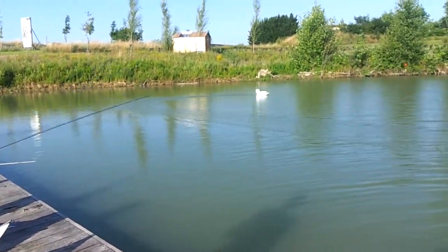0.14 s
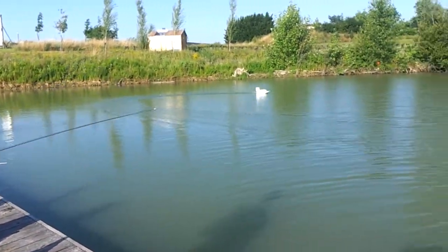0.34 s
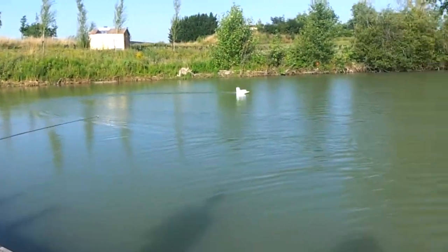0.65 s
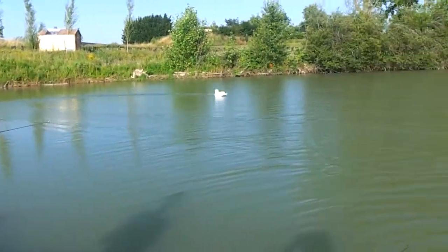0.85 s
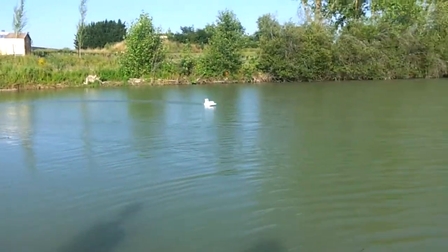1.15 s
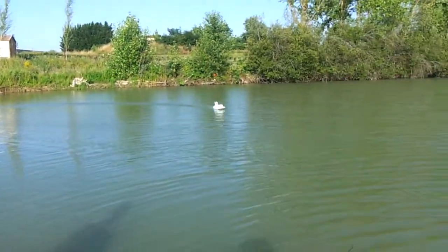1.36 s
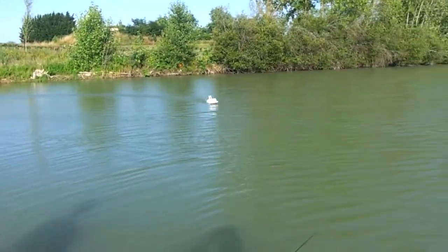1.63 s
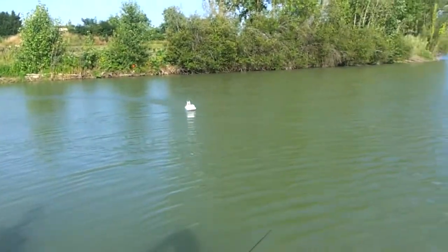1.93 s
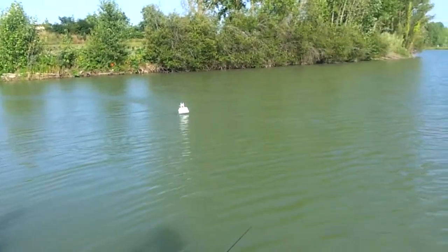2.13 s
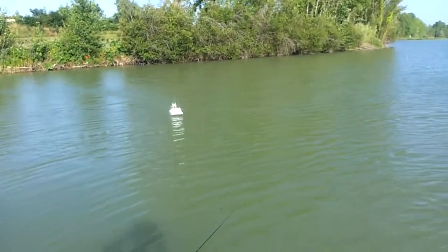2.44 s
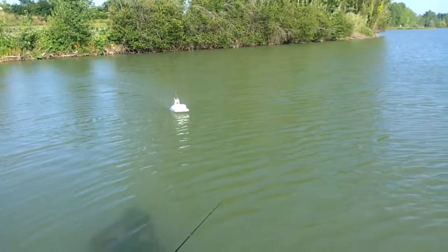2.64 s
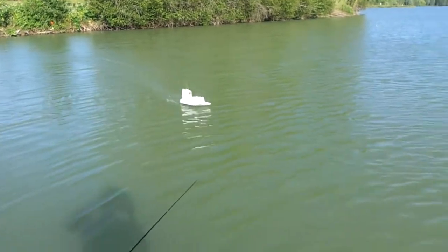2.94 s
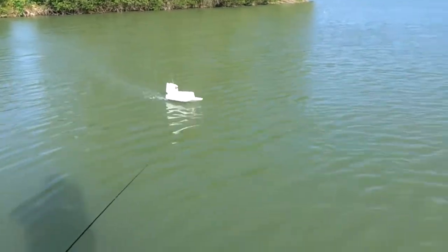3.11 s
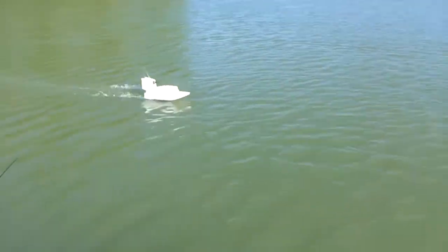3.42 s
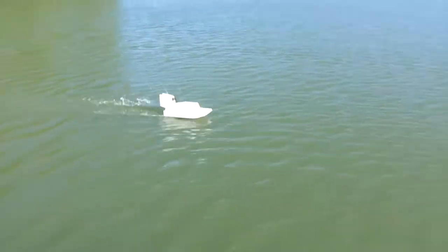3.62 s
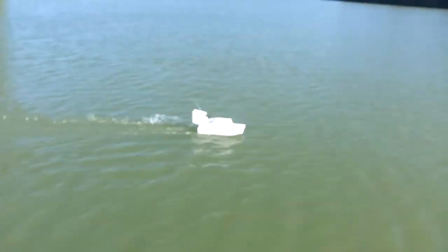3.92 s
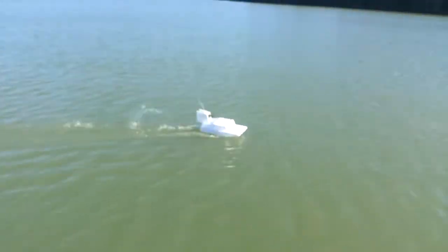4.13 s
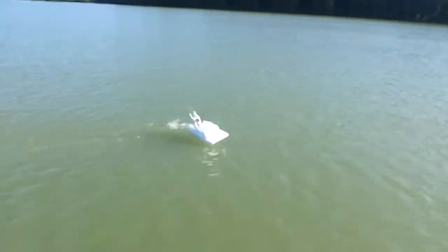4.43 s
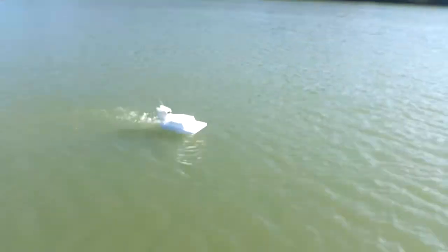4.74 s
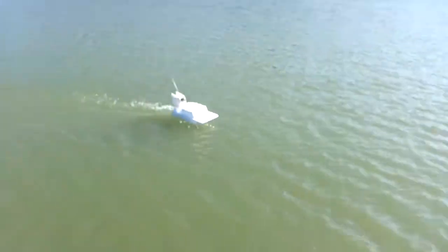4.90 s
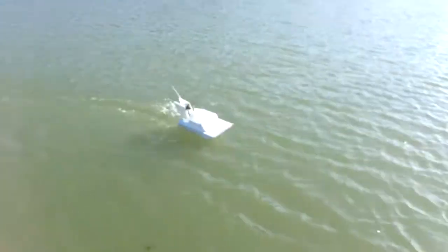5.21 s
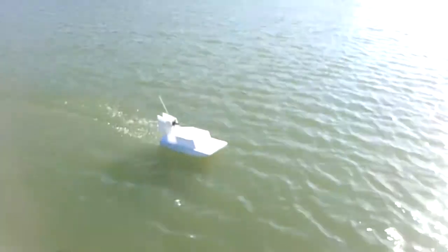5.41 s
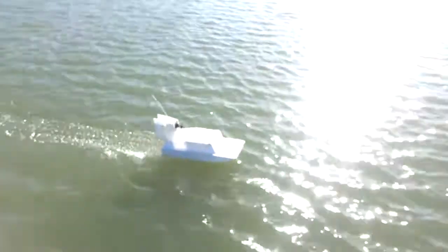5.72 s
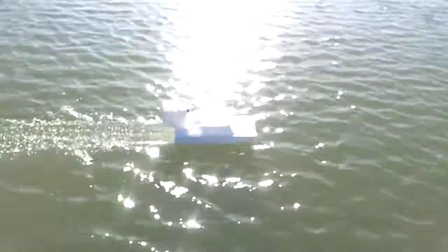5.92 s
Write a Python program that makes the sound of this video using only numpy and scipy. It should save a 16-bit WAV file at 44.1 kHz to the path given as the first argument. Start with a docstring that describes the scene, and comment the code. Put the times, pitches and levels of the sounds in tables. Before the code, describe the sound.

A small model airboat runs on an open pond, heard through a hand-held camera's stereo microphone. From 0 to 1 second, violent wind buffeting dominates: low, rough thumps and crackling blasts, mainly on the right, clip and make the whole sound dip briefly. The propeller's steady buzzing whine is faint underneath. Around 1.1 seconds its hiss grows clearer, then recedes near 1.8 while more gusts hit between 1.5 and 2.5. From 2.1 the boat is stronger, a high-speed drone with fluttering airy hiss, interrupted by scattered puffs. Between 3.5 and 4.3 lighter thumps move to the left. Then the wind almost vanishes and at about 4.4 the propeller surges forward, bright and hissy, slightly hollow from water reflections. It eases, swells again near 5.1, and takes on a rougher buzz from 5.5, still running at 6 seconds. Its pitch barely changes throughout.

```python
"""Airboat on a windy pond

A model airboat curves in over a pond. Its two-blade air propeller whines as steady tones and hisses
as noise that swells at each blade passage; the hiss and the drifting tones also bounce off the water.
Gusts of shaped noise and single thumping puffs buffet a hand-held camera's two unlike microphone ports,
mostly the right one. A gain control makes the whole sound dip briefly at overloads, and peaks clip."""
import sys
import numpy as np
from scipy import signal
from scipy.fft import rfft, irfft, next_fast_len
from scipy.io import wavfile
from scipy.ndimage import uniform_filter1d, minimum_filter1d, map_coordinates

SR = 44100
rng = np.random.default_rng(int(sys.argv[2]) if len(sys.argv) > 2 else 0)


def log_audio(samples):
    """Write samples as a 16-bit WAV file to the path given in sys.argv[1]."""
    # one column per channel
    frames = np.atleast_2d(samples).T
    # limit to full scale, then quantise
    limited = np.clip(frames, -1, 1)
    pcm = np.round(limited * 32767).astype(np.int16)
    wavfile.write(sys.argv[1], SR, pcm)


def voltage_ratio(level):
    """Linear amplitude factor for a level in decibels (scalar or array-like)."""
    return 10 ** (np.asarray(level, float) / 20)


N = 267246
T = np.arange(N) / SR


def unit(x):
    """Scales each row to an rms (average strength) of 1."""
    return x / np.sqrt(np.mean(x ** 2, axis=-1, keepdims=True) + 1e-20)


def along(points, hz):
    """Reads a table of (f/Hz, value) points on a log frequency axis."""
    f, v = np.transpose(points)
    return np.interp(np.log(hz + 1), np.log(f + 1), v)


def curves(rows):
    """Draws one value per sample for each column after the time."""
    s, *columns = np.transpose(rows)
    return np.array([np.interp(T, s, column) for column in columns])


def wobble(rate):
    """Draws a smooth random curve with rate random points a second."""
    points = rng.standard_normal(int(N * rate / SR) + 4)
    return map_coordinates(points, [T * rate])


def swell(start_s, end_s, edge_s):
    """Rises from 0 to 1 over the span and falls back, with soft edges."""
    return (np.tanh((T - start_s) / edge_s) - np.tanh((T - end_s) / edge_s)) / 2


def filtered(x, response):
    """Shapes the loudness and phase of x at each frequency."""
    size = next_fast_len(N + 8192)
    hz = np.fft.rfftfreq(size, 1 / SR)
    return irfft(rfft(x, size) * response(hz), size)[..., :N]


def below(x, edge_hz):
    """Keeps the part of x under a soft edge."""
    return filtered(x, lambda hz: 1 / (1 + (hz / edge_hz) ** 8))


def tones(turn, levels):
    """Sines at multiples of the shaft speed; turbulence makes them flutter, unlike at the two ports."""
    slip = 0.022 * wobble(30) + 0.15 * wobble(6)
    out = np.zeros((2, N))
    for order, db in levels:
        apart = np.array([[-1], [1]]) * wobble(3.073)
        jitter = 0.025 * order * apart + 0.25 * wobble(40)
        phase = order * (turn + slip) + rng.uniform(0, 2 * np.pi) + jitter
        depth = min(1 + 0.2 * order, 2.6)  # high tones flutter most
        flutter_db = depth * (0.6 * wobble(14) + 0.8 * wobble(45))
        # a sine's peak lies 3 dB above its rms
        out += voltage_ratio(db + 3.0 + flutter_db) * np.sin(phase)
    return out


# main tones at rest, the last being the motor's commutation whine: {shaft order: level/dB over the hiss}
MAIN_TONES = {2: -12, 3: -18, 4: -15, 6: -17, 8: -22, 10: -24, 12: -28, 14: -26, 22: -30, 42: -27}
# single tones swell as the boat turns: {shaft order: [(start t/s, end t/s, level/dB over the hiss)]}
TONE_SWELLS = {2: [(0, .25, 8), (.9, 1.5, -7), (3.05, 3.35, -2.5), (4.15, 5.9, -5.5)], 3: [(2.9, 3.5, -8.5),
               (3.75, 4.25, -6.5), (5.95, 6.1, -13.5)], 4: [(0, .3, 4.5), (3.0, 3.3, -6), (3.3, 3.6, -3.5),
               (3.6, 4.2, 4.5), (5.7, 6.1, -8.5)], 6: [(0, 1.0, -1), (1.05, 1.65, -3), (1.7, 2.35, -3),
               (2.4, 2.65, -9.5), (3.3, 4.2, -8.5), (4.55, 4.75, -7), (5.55, 6.1, -9)], 8: [(.2, .95, -11),
               (1.05, 1.9, -19), (2.05, 2.45, -14.5), (3.5, 4.2, -12.5), (4.7, 4.95, -16), (5.5, 6.1, -15)],
               10: [(1.1, 1.7, -8.5), (1.95, 2.3, -8), (2.35, 2.7, -10.5), (3.1, 3.3, -11),
               (4.15, 4.9, -28), (5.4, 5.7, -12), (5.65, 6.0, -3.5)], 12: [(0, .2, 2.5), (.28, .42, 2),
               (.75, 1.1, -20), (1.5, 2.75, -27), (4.3, 4.95, -16.5), (5.3, 6.1, -15)], 14: [(.3, .9, -5.5),
               (3.0, 3.45, -19), (4.3, 5.0, -20), (5.3, 6.1, -18)], 22: [(1.95, 2.1, -18),
               (2.55, 2.75, -18), (3.75, 5.25, -20), (5.7, 6.1, -20.5)], 42: [(0, 1.0, -12.5),
               (1.2, 2.8, -15), (2.85, 3.7, -13), (5.5, 6.1, -16)]}


def order_db(order):
    """Level of one main tone: the power of its swells adds to its rest power."""
    power = voltage_ratio(MAIN_TONES[order]) ** 2 + np.zeros(N)
    for start_s, end_s, db in TONE_SWELLS.get(order, []):
        power = power + (voltage_ratio(db) * swell(start_s, end_s, 0.091)) ** 2
    return 10 * np.log10(power)


# drifting tones, before their slow drift: {shaft order: level/dB over the hiss}
DRIFTING_TONES = {16: -15, 18: -26, 20: -27, 24: -27, 26: -27.5, 28: -28.5}
# tones of unequal blades, before the lift in COURSE_CHANGES: {shaft order: level/dB over the hiss}
UNEVEN_TONES = {7: -45, 9: -32.5, 11: -32, 13: -51}


def drifting_tones(turn, uneven_db):
    """Tones whose levels drift slowly, plus odd shaft orders that come from unequal blades."""
    drifting = tones(turn, [(order, db + 3 * wobble(2.89)) for order, db in DRIFTING_TONES.items()])
    return drifting + tones(turn, [(order, db + uneven_db) for order, db in UNEVEN_TONES.items()])


# how much later the bounce arrives: (t/s, delay/ms)
WATER_DELAY = [(0, 1.6), (1.5, 1.59), (2.5, 1.55), (3.1, 1.43), (4.05, 1.295), (5.1, 1.305), (5.3, 1.26),
               (5.9, 1.015), (6.06, 1.025)]


def off_water(x, share):
    """A later, duller copy off the rippled surface combs the sound (strengthens and weakens bands)."""
    place = np.arange(N) - curves(WATER_DELAY)[0] * SR / 1000
    late = np.array([map_coordinates(row, [place], order=3) for row in x])
    dull = filtered(late, lambda hz: 1 / np.sqrt(1 + (hz / 16000) ** 2))
    return x + np.clip(share, 0, 1) * dull


# left port's colour for broad noise, later scaled as a whole: (f/Hz, relative level/dB per Hz)
LEFT_COLOUR = [(50, -89), (130, -63.5), (220, -52.5), (530, -59.5), (850, -54.5), (1600, -60), (3000, -56),
               (4500, -53.5), (6500, -58), (7600, -56.5), (9800, -47.5), (11500, -44.5), (13000, -49.5),
               (14500, -56)]


def left_port(hz):
    """How strongly the left port takes up broad noise at each frequency."""
    return voltage_ratio(along(LEFT_COLOUR, hz))


# right port's colour on the same scale as the left: (f/Hz, relative level/dB per Hz)
RIGHT_COLOUR = [(50, -86), (130, -75), (220, -56), (430, -61.5), (850, -53), (1300, -54.5), (2100, -54),
                (2600, -53), (3300, -59), (4200, -48), (4800, -41), (5300, -46), (6300, -59), (10000, -64),
                (12000, -66.5), (14500, -71)]
# how far the left port is ahead: (f/Hz, phase/radians)
LEFT_LEAD = [(0, 2.7), (420, 2.6), (850, 2.5), (1300, 2.67), (1900, 2.75), (2150, 3.0), (3450, 3.0),
             (3800, 1.1), (4300, 1.6), (4700, 2.8), (5600, 4.0), (7500, 3.5), (9000, 2.6), (10900, 2.0),
             (12700, .1), (14500, 1.1)]


def to_right(hz):
    """Turns left-port sound into right-port sound: another colour, nearly opposite phase in the lows."""
    f, lead = np.transpose(LEFT_LEAD)
    phase = np.exp(-1j * np.interp(hz, f, lead))
    return voltage_ratio(along(RIGHT_COLOUR, hz)) / left_port(hz) * phase


# how alike the boat's noise is at both ports: (f/Hz, common share of amplitude)
COMMON_SHARE = [(150, 0.52), (400, 0.67), (1700, 0.46), (3000, 0.54), (6000, 0.18), (10000, 0.21),
                (14000, .2)]


def blade_noise(turn, bounce_share):
    """Propeller hiss: noise swells at each blade passage, flutters in the air and reaches both ports."""
    chop = 1 + 0.24 * np.cos(2 * turn) + 0.12 * np.cos(4 * turn)
    gusty = voltage_ratio(0.18 * wobble(8) + 0.95 * wobble(40) + 0.96 * wobble(60))
    common, own = off_water(chop * gusty * rng.standard_normal((2, N)), bounce_share)

    def share(hz):
        return np.clip(along(COMMON_SHARE, hz), 0, 1)

    at_right = filtered(common, share) + filtered(own, lambda hz: np.sqrt(1 - share(hz) ** 2))
    left = filtered(common, left_port)
    right = filtered(at_right, lambda hz: left_port(hz) * to_right(hz))
    # the left port's hiss above 8 kHz sets the level
    return np.array([left, right]) / np.std(left - below(left, 8000))


# shaft speed: (t/s, turns per second)
SHAFT_SPEED = [(0, 211.8), (.6, 213.1), (1.1, 215.1), (1.6, 217.3), (1.85, 216.8), (2.1, 218.3),
               (2.6, 216.1), (3.1, 214.1), (3.6, 213.2), (4.15, 211.7), (4.6, 213.1), (5.1, 213.6),
               (6.06, 213.2)]
# as the boat nears and turns: (t/s, lift of the low slipstream rush/dB, share of the bounce,
# lift of the unequal-blade tones/dB, lift of the right port's treble/dB)
COURSE_CHANGES = [(0, 7, 0.27, -21, 2.5), (1, 6, 0.23, -25, 0.5), (2.4, 5, 0.21, -30, -1),
                  (3, 4.5, 0.22, -5, 1.5), (4.15, 3.5, 0.37, -16, 0.5), (4.4, 0, 0.37, -19, 4),
                  (4.7, 0.5, 0.33, -19, 0.5), (5.2, 0.5, 0.39, -8, 3.5), (5.6, 1, 0.34, 16.5, 0),
                  (6.06, 3, 0.23, 13, 3)]
# propeller hiss above 8 kHz at the left port; the rest of the boat follows: (t/s, level/dB)
HISS_LEVEL = [(0, -25), (.25, -29), (.4, -25), (.75, -26.5), (1.0, -25.5), (1.15, -16), (1.5, -15.5),
              (1.7, -19.5), (1.8, -24), (2.02, -22.5), (2.1, -15.5), (2.4, -14), (2.9, -13), (3.2, -16),
              (3.4, -13), (4.1, -17), (4.45, -8.5), (4.62, -13), (4.85, -13.5), (5.1, -10.5), (5.5, -11),
              (6.06, -11.5)]


def boat():
    """The spinning propeller's tones and blade noise, as the two ports hear them."""
    speed, = curves(SHAFT_SPEED)
    rush_db, bounce_share, uneven_db, facing_db = curves(COURSE_CHANGES)
    turn = 2 * np.pi * np.cumsum(speed) / SR
    drifting = off_water(drifting_tones(turn, uneven_db), bounce_share)
    whine = drifting + tones(turn, [(order, order_db(order)) for order in MAIN_TONES])
    noise = blade_noise(turn, bounce_share)
    rush = (voltage_ratio(rush_db) - 1) * below(noise, 2630)
    sound = noise + rush + [whine[0], filtered(whine[1], to_right)]
    # the right port's treble follows the side the boat is on
    treble = sound[1] - below(sound[1], 2740)
    sound[1] += (voltage_ratio(facing_db) - 1) * treble
    return voltage_ratio(curves(HISS_LEVEL)[0]) * sound


# shifting breeze between the gusts, nearly dying away after 4.3 s:
# (t/s, left strength/dB, right strength/dB)
SHIFTING_BREEZE = [(0, -25, -15), (1.1, -31, -21), (2.3, -34.5, -20), (3.2, -31.5, -25), (3.5, -26, -43),
                   (4.27, -52, -33.5), (4.4, -68, -57), (4.9, -65, -60), (5.2, -45, -43), (6.06, -46, -46)]
# gusts over the breeze: (start t/s, end t/s, port 0 left 1 right, strength/dB)
GUST_SPANS = [(0, .2, 0, -21), (.27, .4, 0, -21.5), (0.413, 0.844, 0, -17), (1.5, 1.75, 0, -32),
              (1.984, 2.06, 0, -17), (2.175, 2.405, 0, -22.5), (2.68, 2.785, 0, -24), (3.0, 3.253, 0, -29),
              (3.386, 3.456, 0, -24), (3.52, 3.82, 0, -21.5), (3.98, 4.29, 0, -22), (0.185, 0.27, 1, -6),
              (.39, 0.464, 1, -4), (0.487, 0.705, 1, 1.5), (0.752, 0.887, 1, -10.5), (0.902, 1.01, 1, -4),
              (1.01, 1.109, 1, -14), (1.597, 1.7, 1, -12), (1.727, 1.775, 1, 1), (1.814, 2.037, 1, -11.5),
              (2.395, 2.48, 1, -13), (3.353, 3.427, 1, -18.5)]


def flow():
    """Wind strength in dB at each port: the power of each gust adds to the breeze."""
    power = voltage_ratio(curves(SHIFTING_BREEZE)) ** 2
    for start_s, end_s, port, db in GUST_SPANS:
        power[port] += (voltage_ratio(db) * swell(start_s, end_s, 0.029)) ** 2
    return 10 * np.log10(power)


# colour of buffeting in light wind: (f/Hz, relative level/dB per Hz)
LIGHT_COLOUR = [(25, -25), (100, -7), (250, 1), (450, 0.5), (900, -19.5), (2000, -54), (5000, -66),
                (12000, -67)]
# colour of buffeting in strong wind: (f/Hz, relative level/dB per Hz)
STRONG_COLOUR = [(25, -45), (100, -21.5), (300, 1.5), (600, -0.5), (1100, -5.5), (2000, -15.5),
                 (5000, -37.5), (12000, -73)]


def wind(flow_db):
    """Turbulence, unrelated at the two ports, comes in lumps; the stronger the moment, the brighter."""
    lump_db = np.array([1.94 * wobble(24.9) + 3 * wobble(70) for _ in flow_db])
    light, strong = [unit(filtered(rng.standard_normal((2, N)), lambda hz: voltage_ratio(along(colour, hz))))
                     for colour in (LIGHT_COLOUR, STRONG_COLOUR)]
    bright = np.clip((flow_db + 1.26 * lump_db + 20.0) / 16, 0, 1)
    # strong flow sheds vortices at the port's edge: one loud swing whose pitch wanders fast
    wander = np.array([0.28 * wobble(90) + 0.28 * wobble(300) for _ in flow_db])
    shed_hz = 680 * np.exp(wander)
    shedding = np.sin(2 * np.pi * np.cumsum(shed_hz, axis=1) / SR)
    strong = unit(0.87 * strong + 1.02 * shedding)
    # the fastest eddies crackle in strong flow
    spikes = rng.standard_normal((2, N)) * (rng.random((2, N)) < 0.007) * bright ** 2
    crackle = filtered(spikes, lambda hz: (hz / 1500) / (1 + (hz / 1800) ** 2.67))
    buffeting = np.sqrt(1 - bright) * light + np.sqrt(bright) * strong
    return voltage_ratio(flow_db + 3.0) * (unit(voltage_ratio(lump_db)) * buffeting + 9 * crackle)


# single puffs: (start t/s, port 0 left 1 right, level/dB, length/ms)
SINGLE_PUFFS = [(.003, 1, -3, 29), (.033, 0, -3, 14.6), (0.04, 1, 2, 7.6), (.075, 0, -10, 13),
                (.091, 1, -7, 14), (.124, 1, -11, 7.5), (.125, 0, -11, 11), (0.14, 1, -7, 4.9),
                (.261, 1, -5, 4.1), (.288, 1, -6, 7.7), (.299, 0, -14, 15), (0.354, 0, -9.5, 5.4),
                (0.418, 0, -16, 22), (.719, 0, -8, 14), (.727, 1, -1, 38), (0.771, 1, -0.5, 37),
                (.797, 0, -9, 36), (.854, 1, -9, 9.5), (1.057, 1, -13, 13), (1.091, 0, -11, 8.5),
                (1.096, 1, -5, 17.6), (1.207, 1, -4, 26), (1.237, 1, -10.5, 13), (1.522, 1, -1, 63),
                (1.665, 1, -3.5, 18.4), (1.691, 1, 0, 21), (1.724, 1, -10, 21), (1.805, 1, -5, 36),
                (1.864, 1, -3, 11), (1.889, 1, -5, 33), (1.96, 1, -4.5, 31), (2.004, 1, -2.5, 9.3),
                (2.023, 0, -14, 16), (2.166, 1, -6.5, 17), (2.24, 1, -7, 12), (2.329, 1, -10, 9.7),
                (2.344, 1, -7.5, 15), (2.368, 0, -9.5, 13), (2.41, 0, -11, 8), (2.41, 1, -8.5, 62),
                (2.512, 1, -3, 8.4), (2.556, 1, -9, 7.2), (2.688, 0, -9, 9.6), (2.986, 0, -17, 16),
                (3.041, 1, -4, 7.4), (3.148, 1, -7, 11.6), (3.192, 1, -4.5, 6.7), (3.364, 1, -3, 8.8),
                (3.532, 0, -5.5, 7.9), (3.578, 0, -4.5, 10.3), (3.641, 0, -8, 6.9), (3.715, 0, -8, 8.1),
                (3.781, 0, -14, 9), (4.03, 0, -8, 6.4), (4.157, 0, -10, 8.9), (4.207, 0, -12, 15)]
# base pitch of a puff in a moderate breeze: (left f/Hz, right f/Hz)
PUFF_PITCH = (410, 474)


def puffs(flow_db):
    """Each eddy strikes suddenly and shakes the membrane for a few uneven cycles around its pitch."""
    moderate_db, rise_per_db, pitch_scatter = -15.5, 0.1, 0.077  # faster flow raises the pitch
    out = np.zeros((2, N + SR))
    t = np.arange(8192) / SR
    hz = np.fft.rfftfreq(len(t), 1 / SR) + 1
    for start_s, port, db, ms in SINGLE_PUFFS:
        faster_db = max(flow_db[port, round(start_s * SR)] - moderate_db, 0)
        scatter = pitch_scatter * rng.standard_normal()
        u = hz / (PUFF_PITCH[port] * np.exp(rise_per_db * faster_db + scatter))
        resonance = u ** 1.12 / np.sqrt((1 - u ** 2) ** 2 + (0.89 * u) ** 2)
        colour = resonance / (1 + (u / 0.74) ** 2) ** 0.53
        rise = 1 - np.exp(-(t / 0.0032) ** 2)
        shape = rise * np.exp(-(t * 1000 / (0.98 * ms)) ** 9.8)
        burst = shape * irfft(rfft(rng.standard_normal(len(t))) * colour)
        burst *= voltage_ratio(db + 0.5) * np.sqrt(np.sum(shape ** 2) / np.sum(burst ** 2))
        first = max(round((start_s - 0.002) * SR), 0)  # the soft rise begins 2 ms early
        out[port, first:][:len(t)] += burst
    return out[:, :N]


def scene():
    """Boat, wind and puffs added together at the two ports."""
    flow_db = flow()
    return boat() + wind(flow_db) + puffs(flow_db)


def top_cut(x):
    """Nothing passes above the cut-off."""
    return signal.sosfilt(signal.butter(12, 14940, fs=SR, output="sos"), x)


def record(dry):
    """A quick gain control shared by both ports ducks at overloads; peaks clip; the band is limited."""
    need = np.minimum(1, 0.99 / (np.abs(dry).max(axis=0) + 1e-9)) ** 0.46
    hold = round(0.022 * SR)
    held = minimum_filter1d(need, hold, origin=hold // 2 - 1)
    gain = uniform_filter1d(held, round(0.019 * SR))
    low_cut = filtered(dry, lambda hz: hz ** 2 / (hz ** 2 + 30 ** 2))
    ducked = low_cut * gain
    clipped = ducked / (1 + np.abs(ducked / 1.02) ** 12) ** (1 / 12)
    mix = filtered(clipped, lambda hz: hz < 14570)
    return top_cut(mix)


dry = scene()
out = record(dry)
log_audio(out)
```